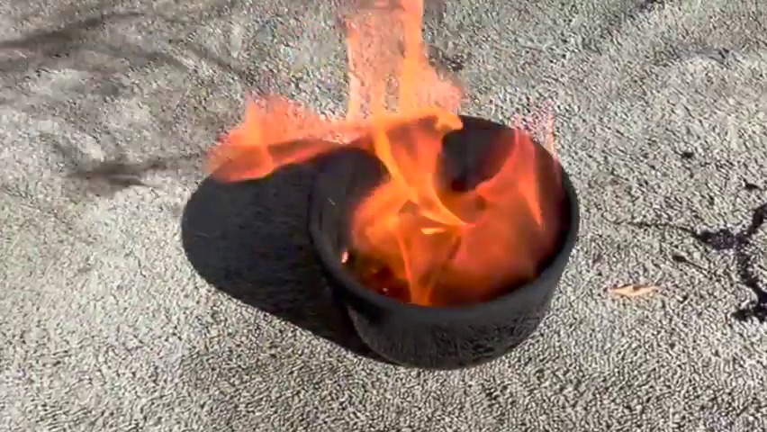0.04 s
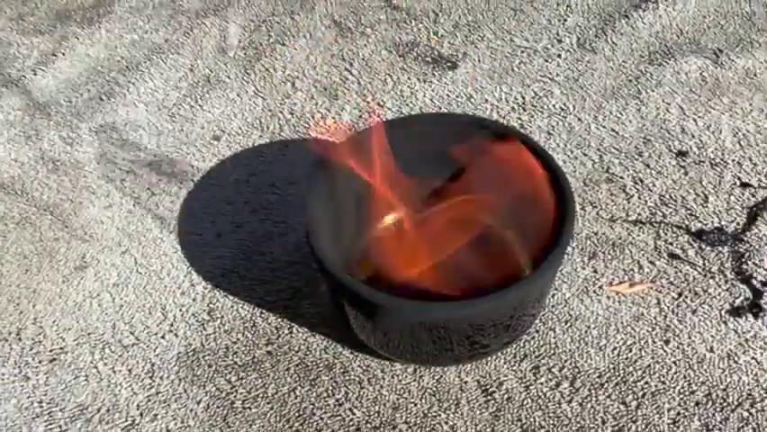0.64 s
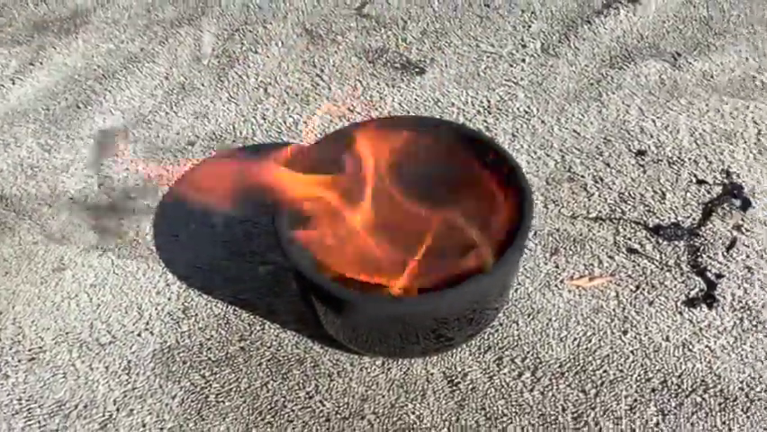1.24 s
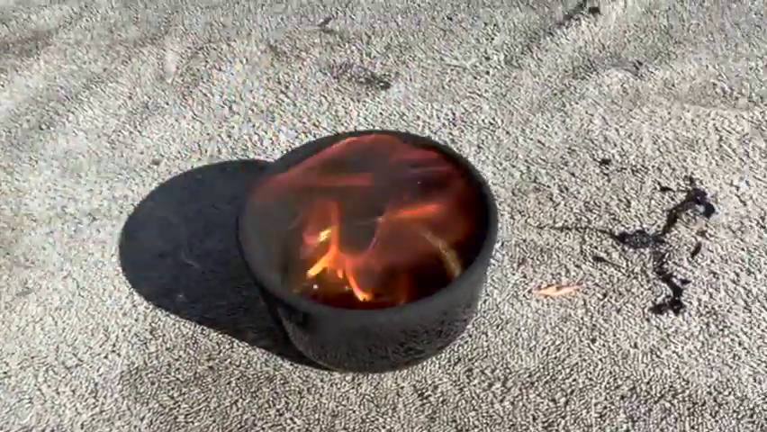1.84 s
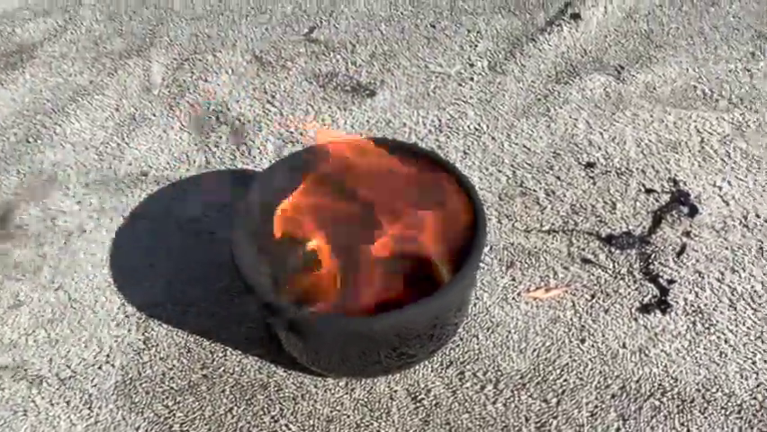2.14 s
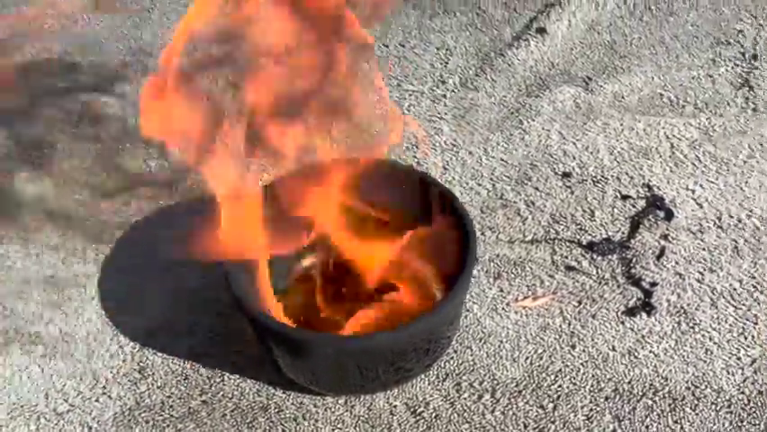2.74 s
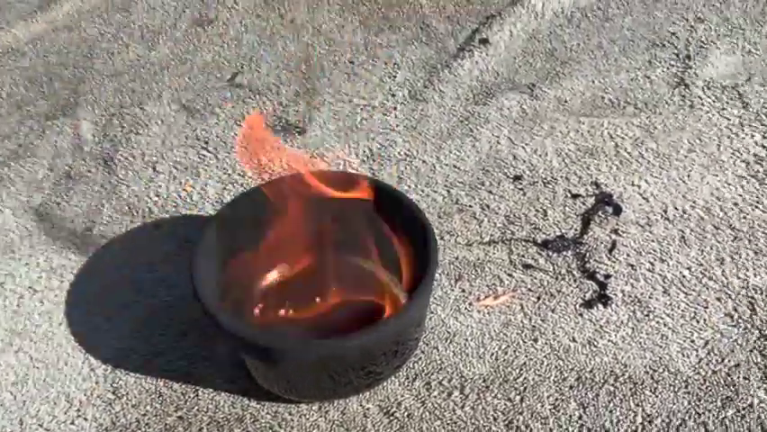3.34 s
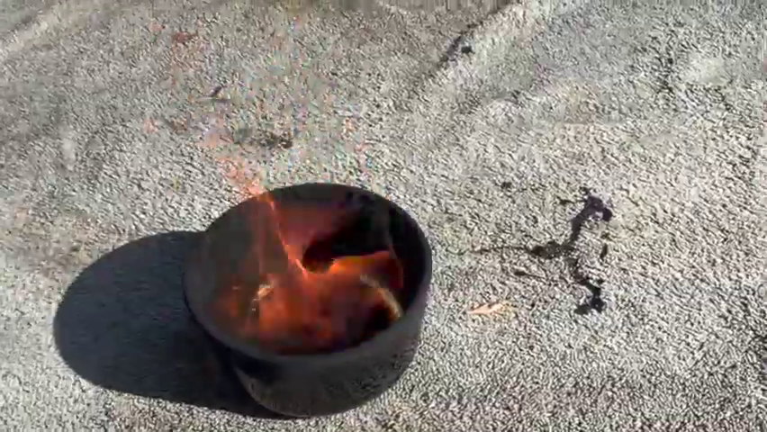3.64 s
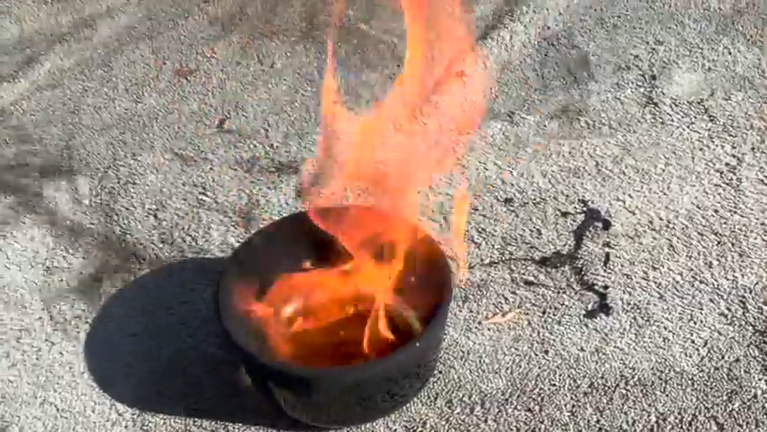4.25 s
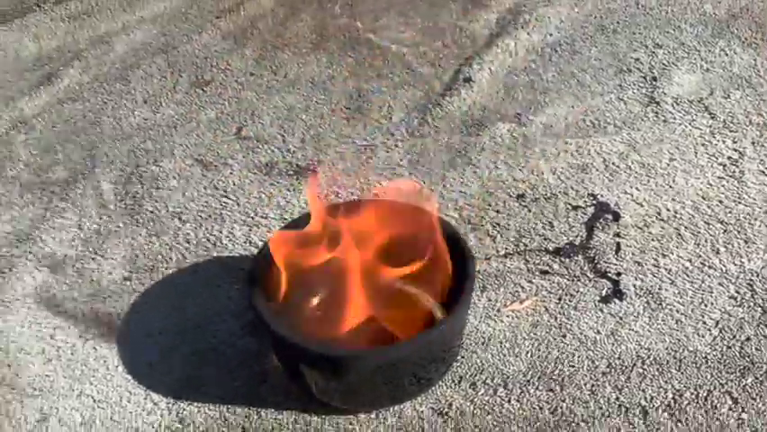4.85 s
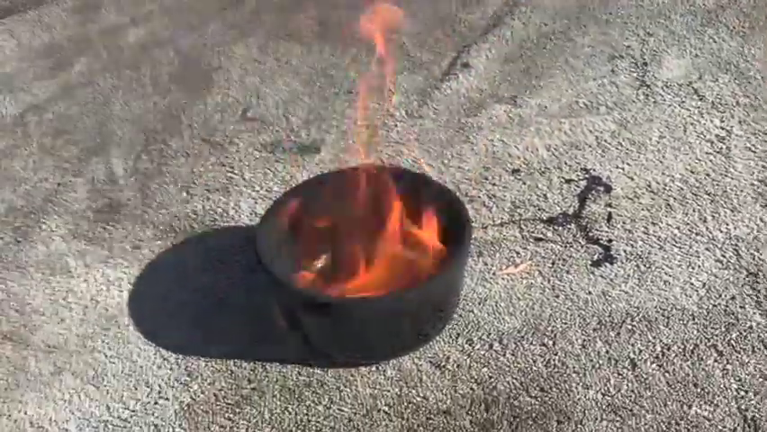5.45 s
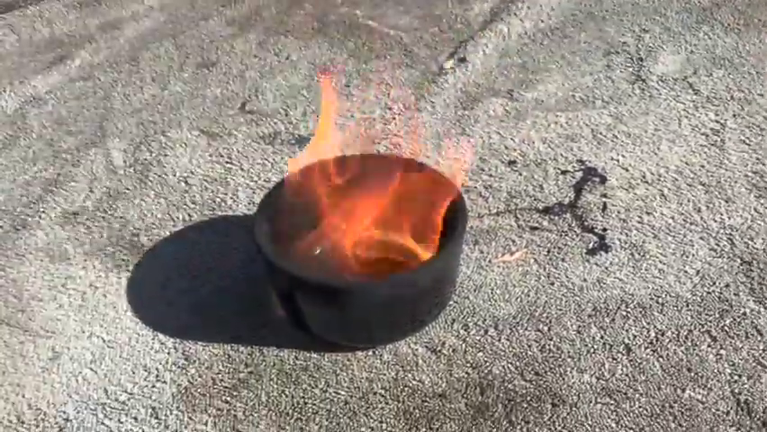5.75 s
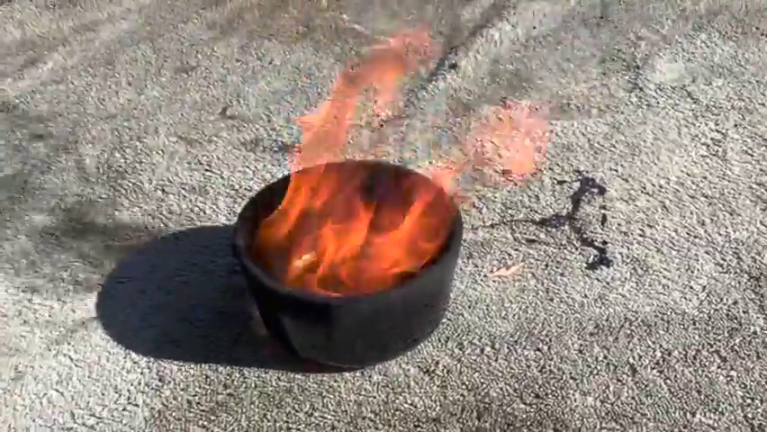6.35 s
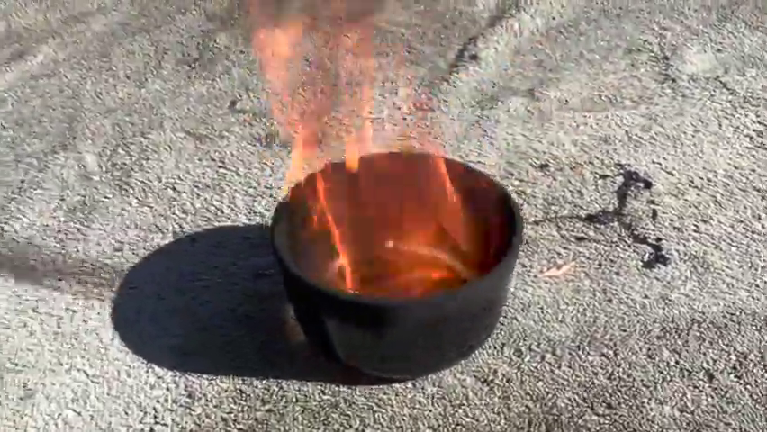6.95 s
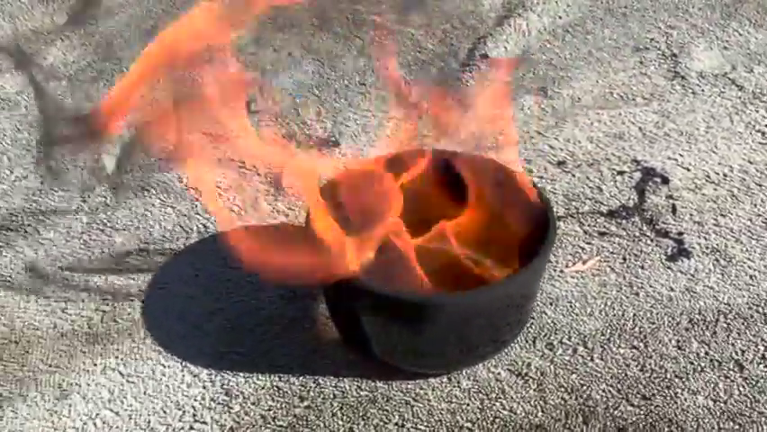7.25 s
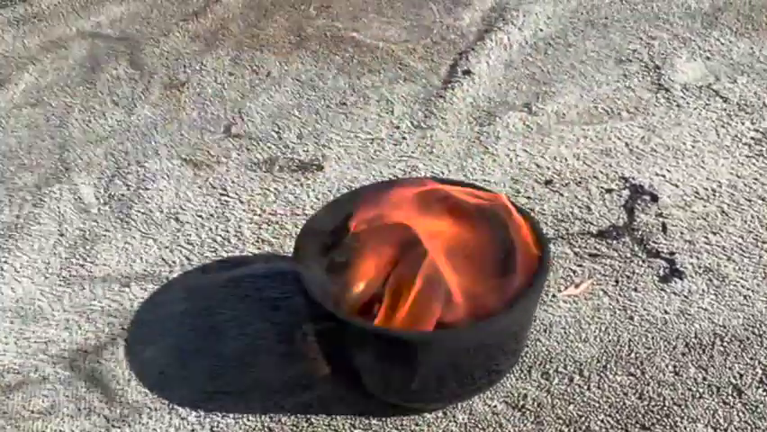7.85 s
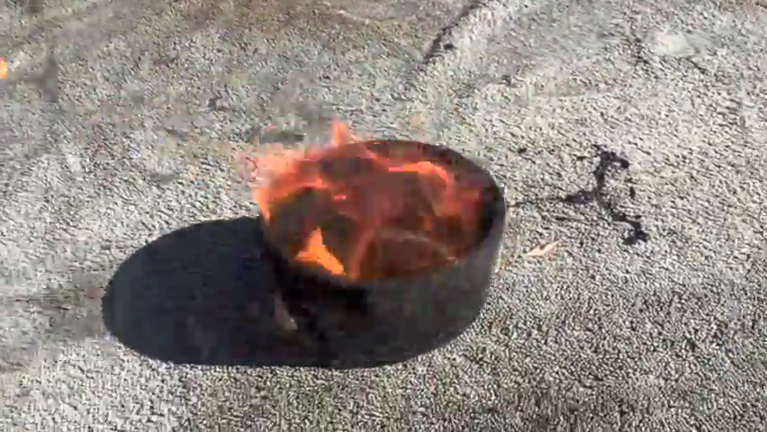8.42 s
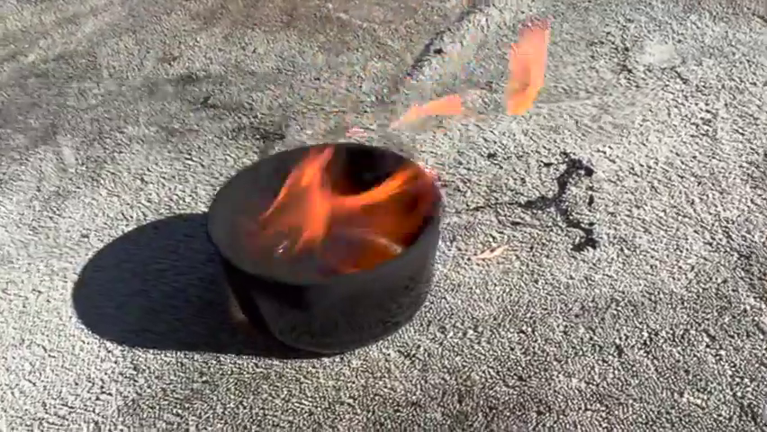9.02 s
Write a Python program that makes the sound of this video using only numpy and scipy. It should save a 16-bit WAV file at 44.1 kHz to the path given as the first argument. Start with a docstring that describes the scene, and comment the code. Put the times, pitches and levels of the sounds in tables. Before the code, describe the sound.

Fuel boils and burns in a small metal cup outdoors, close to the microphone, for about nine seconds. Bursting bubbles make sharp, high, irregular ticks that ring briefly over a fizzing hiss. The flame flutters with a soft roar, swelling in short surges. Stronger cracks stand out around 0.7, 2.2, 3.1 and 3.4 seconds, with the sharpest at 7 and two more at 8 and 8.3. Vapour catches in soft, low puffs near 1.3, 2.8, 4.1 and 7.5 seconds, and most strongly between 8 and 8.3. Behind the fire, a bird gives several faint, thin, rising whistles from 3 to 6 seconds. Two very faint, short, dog-like yelps come from far away at about 7.6 and 8.9. Low wind rumbles throughout, growing a little around 8 seconds, over the faint steady hum of a distant machine.

```python
"""Old gasoline boils and burns in a small metal cup on concrete, close by, outdoors.
Bubbles burst with sharp ticks that ring in the cup. Their spray fizzes and feeds the flame,
which flutters, surges and puffs. The hotter the gas in the cup, the higher it rings.
Behind the fire a bird gives a few thin rising whistles, two faint yelps come from far away,
wind rumbles and a distant machine hums."""
import sys
import numpy as np
from scipy import signal
from scipy.fft import rfft, irfft, next_fast_len
from scipy.io import wavfile
from scipy.ndimage import map_coordinates

SR = 44100
rng = np.random.default_rng(int(sys.argv[2]) if len(sys.argv) > 2 else 0)


def master_out(mix):
    """Clip the mix to full scale and print it as 16-bit PCM to the path in sys.argv[1]."""
    frames = np.transpose(np.atleast_2d(mix))
    ceiling = np.clip(frames, -1, 1)
    pcm = np.round(ceiling * 32767).astype(np.int16)
    wavfile.write(sys.argv[1], SR, pcm)


N = 404838
TIME = np.arange(N) / SR

# Big bubbles bursting. Each row: start in seconds, crack level in dB, pitch in Hz, width in octaves,
# low snap level in dB, spray level in dB. Levels in all tables are relative: the functions adjust them.
BUBBLES = [(0.0145, -27.5, 13700, 0.37, -56, -60), (.046, -30, 5440, 0.15, -40.5, -64),
           (0.1013, -31, 10500, 1.2, -37.5, -50), (.1172, -24, 11400, 0.64, -48, -43),
           (0.134, -26, 11300, 0.15, -69, -51), (.1888, -32.5, 3800, 0.3, -36, -59),
           (.229, -24, 13000, 0.88, -46, -40), (0.2932, -25, 11200, 0.49, -56, -49),
           (0.3125, -28.5, 8650, 0.73, -35.5, -58.5), (.316, -33, 11000, 0.81, -46, -60),
           (0.348, -31, 11000, .25, -57, -64), (0.4572, -24.5, 11100, 0.13, -41, -57),
           (0.5918, -26, 9300, 0.41, -55, -61), (0.6886, -13.5, 11700, 0.89, -28.5, -56),
           (.737, -18, 11700, 0.93, -40, -52), (0.7568, -13.5, 15100, 1.6, -31, -45.5),
           (.938, -38.5, 4380, 0.52, -47.5, -75), (1.0222, -23.5, 10100, 1.3, -43, -45.5),
           (1.1146, -31.5, 8800, 4.6, -30, -52), (1.3225, -25.5, 9100, 1.1, -37.5, -46),
           (1.3458, -29, 4340, 0.66, -40, -40), (1.3603, -25, 13000, 1.2, -50, -59),
           (1.3877, -26, 12000, 0.13, -50, -67), (1.411, -23, 16000, 2.9, -36, -51),
           (1.42, -23, 9900, 0.49, -39.5, -50), (1.4366, -35, 10500, 0.38, -41, -51),
           (1.4836, -27.5, 9500, 0.21, -45, -62), (1.581, -25.5, 5000, 5, -36, -63),
           (1.608, -30.5, 11500, .5, -52, -64), (1.65, -26, 8600, 2.3, -33, -60),
           (1.6777, -29.5, 11100, .6, -51, -58), (1.797, -18.5, 9200, 1.7, -40, -53),
           (1.809, -25.5, 8500, 1.6, -37.5, -50), (1.8663, -28, 8360, 0.9, -40, -60),
           (1.893, -31, 7300, 0.28, -49, -59), (2.0034, -30, 5000, .15, -56, -62),
           (2.013, -19.5, 4600, 0.25, -65, -48), (2.018, -31, 6000, 0.7, -43, -55),
           (2.0278, -20.5, 4960, 0.19, -57, -55), (2.0534, -23, 6650, 1.7, -39, -44),
           (2.062, -25, 5150, .15, -51, -55), (2.066, -30, 5600, .25, -54, -55),
           (2.0996, -31, 9500, .9, -53, -58), (2.1056, -24.5, 5700, 1, -37, -42),
           (2.188, -13, 6250, 0.99, -26.5, -35.5), (2.204, -25, 14200, 0.67, -56, -41),
           (2.2797, -22.5, 4660, 0.13, -25, -35), (2.2915, -21.5, 6240, 0.33, -35, -41.5),
           (2.4084, -22.5, 12200, 0.36, -59, -39.5), (2.6433, -28.5, 7000, .7, -48, -57),
           (2.652, -27, 6660, 0.71, -50, -53), (2.7913, -15, 5660, 0.74, -31, -51),
           (2.8117, -32, 7640, .9, -40, -52), (2.9526, -26, 11400, .7, -48, -52),
           (2.9967, -28, 11500, 0.55, -52, -50), (3.0092, -34, 12300, .35, -56, -46),
           (3.0285, -26.5, 11400, 1.1, -52, -58), (3.1032, -11, 8900, 0.87, -29, -44),
           (3.3077, -29.5, 6600, 0.72, -46, -48), (3.388, -27, 11100, .5, -52, -57),
           (3.4073, -7.5, 8300, 0.22, -33.5, -37), (3.4552, -26, 5200, 0.8, -31, -44),
           (3.4706, -33, 10800, .4, -43, -48), (3.508, -26, 7650, 0.49, -44, -32),
           (3.5804, -28, 8900, 1.2, -56, -59), (3.6553, -25.5, 9500, 2.3, -48, -64),
           (3.6966, -25, 10400, 3.5, -35, -53), (3.8786, -28, 6700, .3, -42, -50),
           (3.9095, -31, 6700, 0.23, -57, -54), (3.9345, -28.5, 4200, 0.78, -41, -66),
           (3.972, -26, 3720, 0.74, -38, -56), (4.0657, -18.5, 9300, 0.51, -39, -39.5),
           (4.1184, -22, 9550, 1.1, -42, -60), (4.254, -22, 4570, 0.41, -38.5, -44),
           (4.3317, -32, 6000, 0.68, -50, -54), (4.4307, -16.5, 10200, 0.84, -53, -67),
           (4.649, -24.5, 7650, 0.29, -39, -51), (4.8792, -25.5, 6550, 0.17, -47, -37),
           (4.9379, -27, 11100, 0.3, -52, -56), (5.2294, -26, 7200, 0.71, -36, -46),
           (5.272, -28.5, 8500, .35, -54, -55), (5.306, -30.5, 14000, .6, -54, -57),
           (5.34, -25, 12000, .8, -41, -35.5), (5.3483, -21, 10400, 2, -45, -58),
           (5.3924, -27.5, 8400, 1.4, -52, -59), (5.4372, -31.5, 8760, 0.94, -49, -52),
           (5.496, -19.5, 10800, 3.3, -41.5, -48), (5.5431, -34.5, 10700, 0.49, -51, -55),
           (5.668, -25, 5400, 3.2, -33, -45), (5.684, -15.5, 8850, 1.2, -31.5, -41),
           (5.6971, -24, 13900, 0.95, -37, -64), (5.721, -27, 12000, .6, -51, -54),
           (5.724, -23, 5500, 1.4, -37, -43), (5.74, -29, 12000, .8, -46, -50),
           (5.7525, -21, 11500, 0.45, -37.5, -36), (5.7703, -24, 10500, 0.65, -43, -51),
           (5.7856, -29, 7000, 1, -41, -47), (5.798, -19, 10300, 0.68, -43.5, -50),
           (5.902, -32, 4800, 0.77, -44, -70), (6.1576, -33, 9100, 0.25, -45, -43),
           (6.27, -35.5, 4730, 0.78, -40.5, -49), (6.7052, -20, 9300, 0.97, -39.5, -64),
           (6.7384, -31, 13400, .3, -61, -65), (6.7814, -30, 10900, 0.87, -41, -69),
           (6.8525, -24.5, 8700, 0.48, -51, -52), (6.8776, -36, 10300, .5, -40, -53),
           (6.8908, -28, 8100, 0.23, -50, -49), (6.926, -23.5, 9300, 0.25, -41, -59),
           (7.0478, -5.5, 9500, 1.3, -26.5, -42), (7.12, -32, 6400, 0.15, -48, -58),
           (7.1458, -27, 7000, 0.98, -39.5, -57), (7.149, -31, 11500, 0.8, -56, -55),
           (7.228, -15, 10100, .85, -35, -57), (7.2576, -35, 10200, 0.72, -36, -55),
           (7.3056, -38, 11500, .25, -50, -68), (7.351, -24, 10500, 0.92, -37, -56),
           (7.354, -18.5, 8850, 1.1, -37, -61), (7.3764, -24, 9900, 0.39, -56, -49),
           (7.4181, -40, 10200, 1, -56, -53), (7.5263, -42, 7000, .9, -22, -46.5),
           (7.535, -29.5, 7600, 0.71, -33, -64), (7.6534, -29, 3900, 0.83, -51, -73),
           (7.79, -24, 3800, 0.58, -47, -42), (7.8334, -32, 11400, 0.1, -43, -50),
           (7.8929, -23, 10100, 0.52, -43.5, -65), (7.956, -24, 3650, 0.094, -38.5, -70),
           (7.9755, -13, 8500, 0.74, -28, -43), (8.0767, -29.5, 8800, 0.79, -43, -68),
           (8.1126, -29, 3900, 0.89, -38.5, -57), (8.2661, -19, 10200, 4.3, -33, -41.5),
           (8.3267, -9, 5170, 0.83, -19, -34.5), (8.4045, -31, 9000, 2.2, -52, -52),
           (8.4258, -32, 10600, 0.9, -53, -52), (8.451, -27, 13000, 0.5, -42, -45),
           (8.4625, -33, 9700, 1.5, -44, -62), (8.6895, -31.5, 8750, 0.12, -64, -50.5),
           (8.7962, -17.5, 10900, 1.7, -47.5, -48), (8.908, -22.5, 12800, 0.93, -49, -63),
           (8.938, -28.5, 3800, 0.87, -51, -52)]
# The tone of a big and of a small bubble's snap. Each row: frequency in Hz, level in dB.
SNAP_TONE = [(80, -34), (300, 0), (700, 0), (1600, 4), (2400, 3.5), (3400, 4.5), (4500, -5), (7000, -35),
             (16000, -89)]
TICK_SNAP_TONE = [(80, -28), (400, -10.5), (1800, -4), (2600, -3), (3300, 8), (16000, -53)]
# The pitches at which the cool cup's air rings. Each row: pitch in Hz, width in Hz, level in dB.
CUP_RINGS = [(4200, 560, 1.5), (6050, 570, -1.5), (7600, 610, 0.5), (8800, 620, 0), (10200, 2400, -6),
             (12000, 2800, -4), (15400, 2100, -2.5)]
# How full of hot gas the cup is; wind that lays the flame over cools it.
# Each row: time in seconds, share from 0 to 1.
CUP_HEAT = [(0, 0.97), (.25, 0.75), (.45, 0.43), (.75, 0.63), (1.1, 0.42), (1.65, 0.21), (2.03, 0.1),
            (2.3, 0.1), (2.5, 0.37), (2.8, 0.53), (3.25, 0.49), (3.45, 0.45), (3.9, .45), (4.15, 0.26),
            (4.65, .7), (5.25, 0.63), (5.6, 0.55), (6.1, 0.5), (6.45, 0.81), (7.05, 0.63), (7.5, 0.5),
            (8, 0.17), (8.55, 0.02), (9.18, 0.56)]
# The quiet, ongoing boil. Each row: time in seconds, roar level in dB, spray level in dB.
SIMMER_LEVELS = [(0.0, -50, -51), (0.4, -63, -62), (0.9, -60.5, -65.5), (1.3, -51.5, -51.5),
                 (2.0, -53.5, -51.5), (2.17, -55, -77), (3.3, -50, -46), (4.0, -53, -51.5),
                 (4.6, -48.5, -51), (4.78, -55, -53), (4.95, -53.5, -54.5), (5.55, -55.5, -57),
                 (6.2, -53, -62), (6.7, -49, -48.5), (7.2, -49, -53), (7.7, -49.5, -62),
                 (8.7, -58.0, -67.5), (9.18, -55, -64)]
# The fuel boils up and the flame surges. Each row: start in seconds, rise time in seconds,
# seconds from the start until it fades, roar level in dB, spray level in dB.
FLAME_SURGES = [(.001, 0.025, .28, -48.5, -51), (0.091, 0.01, 0.06, -40, -37.5),
                (0.453, 0.0038, 0.13, -46.5, -50), (0.703, 0.036, .016, -39.5, -39.5),
                (1.116, 0.011, 0.022, -45.5, -46.5), (1.246, 0.016, 0.28, -61, -60),
                (1.665, 0.036, 0.032, -38.5, -38), (1.785, 0.05, 0.18, -49.5, -54.5),
                (2.336, 0.024, 0.092, -44, -38), (2.444, 0.051, 0.4, -44.5, -41),
                (2.78, 0.042, 0.17, -45.5, -36), (3.164, 0.03, 0.014, -40.5, -35),
                (3.377, 0.027, .2, -46.5, -40), (3.791, .034, 0.076, -46, -44),
                (4.125, 0.028, 0.36, -45.5, -42.5), (4.975, 0.065, 0.19, -40.5, -50),
                (5.256, 0.051, 0.016, -43, -36), (5.656, .034, 0.17, -53, -52),
                (5.889, 0.045, 0.19, -52.5, -49), (6.269, .02, 0.13, -44.5, -55),
                (6.435, 0.017, 0.075, -43, -52), (6.866, .034, 0.11, -46, -51),
                (7.202, 0.013, .066, -44.5, -50), (7.383, 0.051, 0.074, -40, -47.5),
                (7.964, 0.029, 0.22, -46.5, -50), (8.363, 0.029, 0.085, -42, -40.5),
                (8.479, 0.038, 0.087, -43, -48.5), (8.88, 0.02, 0.15, -50, -52.5)]
# The tone of the flame in a cool and in a hot cup. Each row: frequency in Hz, level in dB.
COOL_ROAR_TONE = [(40, -25), (110, 4.5), (190, 4), (420, 3), (800, -2), (1300, -2), (1750, -9),
                  (2300, -14.5), (3300, -10), (6000, -27), (16000, -42)]
HOT_ROAR_TONE = [(40, -21), (110, 1.5), (200, 3.5), (420, 1.5), (800, 1), (1300, -3.5), (1900, -3),
                 (2600, -2.5), (3300, -18), (6000, -22.5), (16000, -24.5)]
# Pockets of vapour catching fire. Each row: start in seconds, level in dB, base pitch in Hz.
VAPOUR_PUFFS = [(0.755, -28.5, 200), (1.323, -25, 177), (1.702, -31.5, 168), (2.221, -28, 331),
                (2.279, -34, 512), (2.791, -24, 240), (3.106, -28.5, 201), (4.134, -23.5, 173),
                (4.173, -30, 208), (5.994, -31.5, 256), (7.05, -61, 220), (7.488, -26, 252),
                (7.976, -20.5, 207.5), (8.265, -25, 154), (8.327, -20, 175)]
# How the microphones colour the fire's treble. Each row: frequency in Hz, level change in dB.
MICROPHONE_TREBLE = [(4000, 4.5), (8000, 0), (9200, 0), (10100, -2.5), (11300, 2.5), (12500, 1.5),
                     (13800, -10), (15300, 5.5), (16000, -1)]
# How early the fire reaches the left microphone. Each row: frequency in Hz, lead in radians.
LEFT_LEAD = [(100, -0.5), (1000, 1.5337), (2000, 1.7252), (3100, 4), (4200, 4.5), (5300, 3.5), (6000, 7),
             (7000, 5.5), (8400, 8), (9300, 4), (10200, 3.5), (11400, 0.2), (12800, 1.3), (13700, -6.5),
             (14700, -7), (16000, 4)]
# How much louder the fire is on the left. Each row: frequency in Hz, left minus right in dB.
LEFT_LOUDER = [(100, 1.5), (400, 1.5), (1100, 5.5), (1600, 2), (2200, -1), (3500, 2.5), (7500, 2.5),
               (9000, -3.5), (10200, 0)]
# How alike the fire sounds on both sides. Each row: frequency in Hz, likeness from 0 to 1.
LIKENESS = [(300, 0.81), (1000, 1), (2400, 0.53), (3100, 1), (4500, 0.13), (8200, 0.034), (10000, 0.72),
            (12000, 0.5), (13300, 1), (15500, 0.28)]
# The bird's notes. Each row: start in seconds, length in seconds, first pitch in Hz,
# top pitch in Hz, climb time in seconds, level in dB.
BIRD_NOTES = [(3.082, 0.36, 5940, 7050, .17, -58), (3.316, 0.073, 7800, 8150, .08, -48),
              (4.213, 0.27, 7940, 8650, 0.27, -55), (4.814, 0.17, 5850, 6330, .07, -43),
              (5.017, 0.17, 6400, 8060, .15, -43.5), (5.618, 0.22, 5640, 6310, 0.056, -45.5),
              (5.832, 0.13, 6520, 8360, .1, -50.5)]
# Short far-off calls. Each row: start in seconds, length in seconds, pitch in Hz, level in dB.
FAR_YELPS = [(7.631, 0.013, 380, -47.5), (8.878, 0.03, 562, -47.5)]
# The tone of the yelps and of the wind. Each row: frequency in Hz, level in dB.
YELP_TONE = [(300, -51), (750, 13), (1150, 3.5), (1500, -9), (2500, -24), (5000, -60)]
WIND_TONE = [(15, -43), (28, -19), (40, 8), (60, 8), (90, 8.5), (130, 3), (200, -10.5), (400, -36),
             (1000, -33), (3000, -77), (16000, -47)]
# The wind freshens and eases. Each row: time in seconds, level in dB.
WIND_LEVELS = [(0, -47), (1.6, -45.5), (2.3, -47.5), (6.8, -47.5), (8.3, -42.5), (9.18, -48.5)]
# The tones of the far machine. Each row: pitch in Hz, level in dB.
MACHINE_TONES = [(59.1, -47.5), (72, -61), (91.4, -57.5), (117.8, -59.5), (133.8, -54.5), (150, -66.5)]

HOT_SHIFT, HOT_BLUR, HOT_TILT_DB = 0.2, 0.94, 4  # full heat: share higher, share wider, dB per octave
HOLLOW_HZ, HOLLOW_OCTAVES = 2867, 0.073  # the cool cup's air cancels sound here
SPRAY_RISE_S, SPRAY_HOLD_S, SPRAY_FALL_DB_PER_S = 0.0049, 0.0022, 287  # spray lingers, then burns off
SURGE_FALL_DB_PER_S, FLARE_DB = 203, -4.5


def bubble_pops(heat, crack_db=-3.0, snap_db=1, tear_db=-1, tear_s=0.00056, wall_db=-8, ring_db=-17,
                ring_fade_s=0.053, cool_ring_db=-7, cool_fade_s=0.015, cool_drop=0.24, size=2048):
    """A bubble's film tears with a crack, the cup rings, and the freed vapour gives a low snap."""
    out, t, hz = np.zeros((2, N)), np.arange(size) / SR, np.fft.rfftfreq(size, 1 / SR)
    click = t == 0
    ring_hz, ring_width, ring_levels = np.transpose(CUP_RINGS)
    for start, db, pitch_hz, octaves, low_db, _ in BUBBLES:
        warmth = heat[int(np.clip(start * SR, 0, N - 1))]
        tear = rng.standard_normal(size) * t * np.exp(-t / tear_s)
        walls = amp(wall_db) * noise_burst(t, fade_s=.007)
        ringing = amp(ring_db) * noise_burst(t, ring_fade_s)
        blow = click + amp(tear_db) * tear / np.linalg.norm(tear) + walls + ringing
        crack = irfft(rfft(blow) * ringing_filter(bubble_gain(hz, pitch_hz, octaves) * cup(hz, warmth)))
        add(out, start, at_level(crack, db + crack_db))
        # still, cool air rings on at its sharpest pitches
        rings = np.sin(2 * np.pi * ring_hz[:, None] * (1 + HOT_SHIFT * warmth) * t)
        rings *= fade(t, cool_fade_s)
        strengths = amp(ring_levels + 2 * rng.standard_normal((2, len(ring_hz))))
        strengths *= bubble_gain(ring_hz, pitch_hz, octaves) / ring_width ** 2
        add(out, start, (1 - warmth) ** 2 * at_level(strengths @ rings, db + cool_ring_db))
        # sound is slower in cool air, so the snap lies lower
        push = click + .3 * noise_burst(t, fade_s=.012)
        snap_gain = amp(along(SNAP_TONE, hz * (1 + cool_drop * (1 - warmth)))) * hollow(hz, warmth)
        snap = irfft(rfft(push) * ringing_filter(snap_gain))
        add(out, start, at_level(snap, low_db + snap_db))
    return out


def bubble_ticks(spray_db, heat, tick_db=-48, spread_db=6.5, cap_db=-40, snap_db=-12, follow=0.63,
                 centre_hz=9800, spread_octaves=0.41, width_octaves=0.56, count=340, size=512):
    """Small bubbles burst at random moments, each at its own pitch, even while the flame is low."""
    out, t, hz = np.zeros((2, N)), np.arange(size) / SR, np.fft.rfftfreq(size, 1 / SR)
    starts = rng.integers(N, size=count)
    strength, highness = np.clip(rng.standard_normal((2, count)), -2, 2)
    bubble = bubble_gain(hz, centre_hz * 2 ** (spread_octaves * highness[:, None]), width_octaves)
    noise = rng.standard_normal((count, size)) + 0.041 * rng.standard_normal((2, count, size))
    tear = noise * fade(t, fade_s=.006)
    ticks = irfft(rfft(tear) * ringing_filter(bubble * cup(hz, heat[starts, None])))
    boil_db = follow * (spray_db - np.mean(spray_db))[starts]  # more spray, louder ticks
    db = np.minimum(tick_db + spread_db * strength + boil_db, cap_db)
    snap = unit(irfft(ringing_filter(amp(along(TICK_SNAP_TONE, hz)))))
    for k in range(count):
        snap_gain = amp(snap_db - 2 * highness[k])  # bigger, lower bubbles snap harder
        add(out, starts[k] / SR, amp(db[k]) * (unit(ticks[:, k]) + snap_gain * snap))
    return out


def bubble_gain(hz, pitch_hz, octaves):
    """A bubble sounds strongest at its own pitch and weaker to either side."""
    return 1 / (1 + (np.log2((hz + 1) / pitch_hz) / octaves) ** 2)


def spray_fizz(spray_db, heat, drops_per_s=1500, hiss_db=-7):
    """Tiny droplets crackle in the flame: more spray means more of them, merging to a hiss."""
    density = drops_per_s * amp(0.76 * (spray_db - np.mean(spray_db)))
    droplets = unit(random_clicks(density, spread_db=7) / np.sqrt(density))
    crackle = reflections(droplets + amp(hiss_db) * rng.standard_normal(N), share=0.27, fade_s=0.0023)
    return amp(spray_db) * in_cup(crackle, heat, cup)


def flame(roar_db, heat, flame_db=1, flutter_db=1.5, self_heating=0.4):
    """Burning droplets expand in many small pushes: a fluttering roar, brighter when hot or surging."""
    pushes = random_clicks(2400, spread_db=2.0) + .5 * rng.standard_normal(N)
    roar = in_cup(reflections(pushes, share=0.21, fade_s=0.0084), heat, hollow)
    cool, hot = with_tone(roar, COOL_ROAR_TONE), with_tone(roar, HOT_ROAR_TONE)
    glow = np.clip(heat * amp(self_heating * (roar_db - np.mean(roar_db))), 0, 1)
    return amp(roar_db + flame_db + flutter_db * wobble(70)) * ((1 - glow) * cool + glow * hot)


def burning_levels():
    """Roar and spray levels in dB: the simmer, plus each surge, plus a flare after each big bubble."""
    power = amp(curves(SIMMER_LEVELS)) ** 2
    for start, rise_s, hold_s, roar_db, spray_db in FLAME_SURGES:
        surge = swell(rise_s, hold_s, SURGE_FALL_DB_PER_S)
        add(power, start, (amp([[roar_db], [spray_db]]) * surge) ** 2)
    flare = swell(SPRAY_RISE_S, SPRAY_HOLD_S, SPRAY_FALL_DB_PER_S)
    for start, *_, snap_db, spray_db in BUBBLES:
        roar_db = (snap_db + spray_db) / 2 + FLARE_DB  # vapour and spray both feed the flame
        add(power, start, (amp([[roar_db], [spray_db]]) * flare) ** 2)
    return 10 * np.log10(power)


def puffs(fade_s=0.084, rise_s=0.0016, glide=2.16, glide_s=0.00317, sink_s=0.0492, size=6000):
    """Vapour catches in a swelling ball of flame, whose pitch drops as it grows."""
    out, t = np.zeros(N), np.arange(size) / SR
    for start, db, base_hz in VAPOUR_PUFFS:
        hz = base_hz * (1 + glide * np.exp(-t / glide_s)) * np.exp(-t / sink_s)
        phase = 2 * np.pi * np.cumsum(hz) / SR
        keep_lows = signal.butter(2, base_hz, fs=SR, output='sos')
        churn = unit(signal.sosfilt(keep_lows, rng.standard_normal(size)))
        loudness = 0.91 * amp(db) * (1 - np.exp(-t / rise_s)) * fade(t, fade_s)
        add(out, start, loudness * np.sin(phase + 1.14 * churn))
    return out


def cup(hz, heat):
    """The cup's air boosts its ringing pitches, which rise and blur with heat; lows barely pass."""
    cool_hz, blur = hz / (1 + HOT_SHIFT * heat), 1 + HOT_BLUR * heat
    power = sum(amp(db) ** 2 / (1 + (2 * (cool_hz - centre) / (width * blur)) ** 2)
                for centre, width, db in CUP_RINGS) / blur
    low_cut = 1 + (3750 / (cool_hz + 1)) ** 26
    brighten_db = HOT_TILT_DB * heat * np.log2((hz + 1) / CUP_RINGS[2][0])
    return np.sqrt(power / low_cut) * amp(along(MICROPHONE_TREBLE, hz) + brighten_db)


def hollow(hz, heat):
    """The cup's air cancels a narrow band below its lowest ring; this gap also rises with heat."""
    away = np.log2((hz + 1) / (HOLLOW_HZ * (1 + HOT_SHIFT * heat))) ** 2
    return away / (away + HOLLOW_OCTAVES ** 2)


def in_cup(x, heat, gain, size=512):
    """Shape a stereo sound by gain(hz, heat), following the heat from moment to moment."""
    pieces = np.pad(x, ((0, 0), (0, -N % size))).reshape(2, -1, size)
    gains = gain(np.fft.rfftfreq(2 * size, 1 / SR), heat[::size, None])
    return unit(join(irfft(rfft(pieces, 2 * size) * ringing_filter(gains)), size))


def microphones(x, near_alike=0.76):
    """The camera's body delays and shades the fire at each microphone; reflections widen some bands."""
    def width(hz):
        signs = np.array([[1], [-1]])
        alike = np.clip(along(LIKENESS, hz), 0, .99)
        return np.sqrt((1 + alike * signs) / (1 + near_alike * signs))
    def delay_and_shade(hz):
        left = amp(along(LEFT_LOUDER, hz) / 2) * np.exp(.5j * along(LEFT_LEAD, hz))
        pair = np.array([left, 1 / left])
        return pair / np.sqrt(np.mean(abs(pair) ** 2, axis=0))
    mid, side = filtered(np.array([x[0] + x[1], x[0] - x[1]]) / 2, width)
    return filtered(np.array([mid + side, mid - side]), delay_and_shade)


def bird(waver=0.0098, flutter_db=2.0):
    """A bird whistles thin, climbing notes that waver in pitch and strength."""
    out = np.zeros(N)
    drift = 1 + waver * wobble(730)
    for start, length, low_hz, high_hz, climb_s, db in BIRD_NOTES:
        on = (TIME > start) & (TIME < start + length)
        t = TIME[on] - start
        hz = (low_hz + (high_hz - low_hz) * np.minimum(t / climb_s, 1)) * drift[on]
        arch = np.sqrt(2 * abs(np.sin(np.pi * t / length)))
        out[on] += amp(db) * arch * np.sin(2 * np.pi * np.cumsum(hz) / SR)
    return reflections(out * amp(flutter_db * wobble(60)), share=0.9, fade_s=0.15, size=4096)


def yelps(roughness=0.045):
    """Two faint, dog-like calls from far away; a shaky pitch makes them hoarse."""
    out = np.zeros(N)
    for start, length, hz, db in FAR_YELPS:
        arch = np.sin(np.pi * np.clip((TIME - start) / length, 0, 1))
        phase = 2 * np.pi * np.cumsum(hz * (1 + roughness * wobble(300))) / SR
        voice = sum(amp(along(YELP_TONE, k * hz)) * np.sin(k * phase) for k in range(1, 5))
        out += amp(db) * arch * voice
    return reflections(out, share=0.2, fade_s=0.038, size=4096)


def wind(gust_db=2.5, side_db=-12):
    """Moving air makes a low rumble that swells with each gust."""
    mid, side = rng.standard_normal((2, N)) * amp([[0], [side_db]])
    rumble = with_tone(np.array([mid + side, mid - side]), WIND_TONE)
    return amp(curves(WIND_LEVELS)[0] + gust_db * wobble(4.7)) * rumble


def machine_hum(waver_db=0.32):
    """A far machine hums with a few low, slightly unsteady tones."""
    out = np.zeros(N)
    for hz, db in MACHINE_TONES:
        loudness = np.sqrt(2) * amp(db + waver_db * wobble(5.4))
        out += loudness * np.sin(2 * np.pi * hz * TIME + .5 * wobble(5.9))
    return out


def reflections(x, share, fade_s, size=1024):
    """Stereo from mono: the direct sound plus short echoes that shift as the air moves."""
    pieces = np.pad(x, (0, -N % size)).reshape(-1, size)
    tails = rng.standard_normal((2, len(pieces), size)) * fade(np.arange(size) / SR, fade_s)
    tails /= np.linalg.norm(tails, axis=-1, keepdims=True)
    echoes = join(irfft(rfft(pieces, 2 * size) * rfft(tails, 2 * size)), size)
    return np.sqrt(1 - share) * x + np.sqrt(share) * echoes


def join(pieces, size):
    """Join stereo pieces, letting each ring into the next."""
    pieces[:, 1:, :size] += pieces[:, :-1, size:]
    return pieces[..., :size].reshape(2, -1)[:, :N]


def random_clicks(rate, spread_db):
    """Clicks of varied size at random moments, about `rate` a second."""
    sizes = amp(spread_db * np.clip(rng.standard_normal(N), -2, 2))
    return unit((rng.random(N) < rate / SR) * sizes * rng.choice([-1, 1], N))


def noise_burst(t, fade_s):
    """Fading stereo noise with a total energy of about 1 on each side."""
    return rng.standard_normal((2, len(t))) * fade(t, fade_s) * np.sqrt(2 * np.log(1000) / (fade_s * SR))


def fade(t, fade_s):
    """A gain that falls by 60 dB every fade_s seconds."""
    return amp(-60 * t / fade_s)


def swell(rise_s, hold_s, fall_db_per_s):
    """A gain that rises from zero and starts dying away at hold_s."""
    t = np.arange(int((hold_s + .5) * SR)) / SR
    return np.minimum(t / rise_s, 1) * amp(-fall_db_per_s * np.maximum(t - hold_s, 0))


def wobble(rate):
    """A smooth curve through `rate` random values a second."""
    steps = np.arange(0, N * rate / SR + 1, 1 / 8)
    smooth = map_coordinates(rng.standard_normal(int(steps[-1]) + 4), [steps])
    return np.interp(TIME * rate, steps, smooth)


def amp(db):
    """Turn decibels into a gain, the number a sound is multiplied by."""
    return 10 ** (np.asarray(db) / 20)


def unit(x):
    """Scale a sound to an average power of 1."""
    return x / np.sqrt(np.mean(x ** 2) + 1e-20)


def at_level(x, db, span_s=.003):
    """Give a short stereo sound the energy of span_s seconds at this level."""
    return amp(db) * x * np.sqrt(span_s * SR * len(x) / np.sum(x ** 2))


def along(table, hz):
    """Read between a table's rows at these frequencies, on an octave scale."""
    row_hz, values = np.transpose(table)
    return np.interp(np.log(hz + 1), np.log(row_hz + 1), values)


def curves(table):
    """One value per sample for each column after the time."""
    times, *columns = np.transpose(table)
    return [np.interp(TIME, times, column) for column in columns]


def filtered(x, response):
    """Multiply each frequency in a sound by response(hz)."""
    size = next_fast_len(N + 8192)
    return irfft(rfft(x, size) * response(np.fft.rfftfreq(size, 1 / SR)), size)[..., :N]


def with_tone(x, table):
    """Shape a sound by a tone table, at an average power of 1."""
    return unit(filtered(x, lambda hz: amp(along(table, hz))))


def ringing_filter(gain):
    """A filter with these gains that starts sharply and rings afterwards."""
    cepstrum = irfft(np.log(np.maximum(gain, 1e-6)))  # the log gains, laid out in time
    half = cepstrum.shape[-1] // 2
    forward_only = np.r_[1, np.full(half - 1, 2), 1, np.zeros(half - 1)]
    return np.exp(rfft(cepstrum * forward_only))


def add(track, start, sound):
    """Mix a short sound into the track at `start` seconds."""
    part = track[..., max(round(start * SR), 0):][..., :sound.shape[-1]]
    part += sound[..., :part.shape[-1]]


def scene():
    """The fire close by, the outdoors behind it."""
    roar_db, spray_db = burning_levels()
    heat = curves(CUP_HEAT)[0]
    boiling = bubble_pops(heat) + spray_fizz(spray_db, heat) + bubble_ticks(spray_db, heat)
    fire = boiling + flame(roar_db, heat) + puffs()
    return microphones(fire) + bird() + yelps() + wind() + machine_hum()


def record(dry, top_hz=16000):
    """Flatten peaks beyond full scale and cut the treble above top_hz."""
    return filtered(np.clip(dry, -1, 1), lambda hz: 1 / np.sqrt(1 + (hz / top_hz) ** 120))


dry = scene()
out = record(dry)
master_out(out)
```